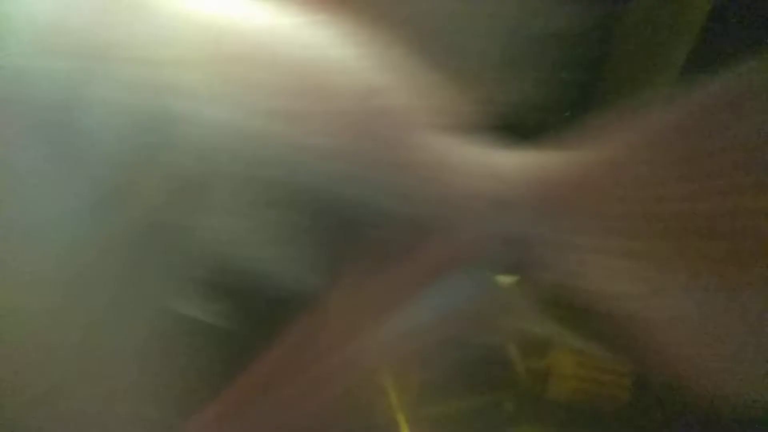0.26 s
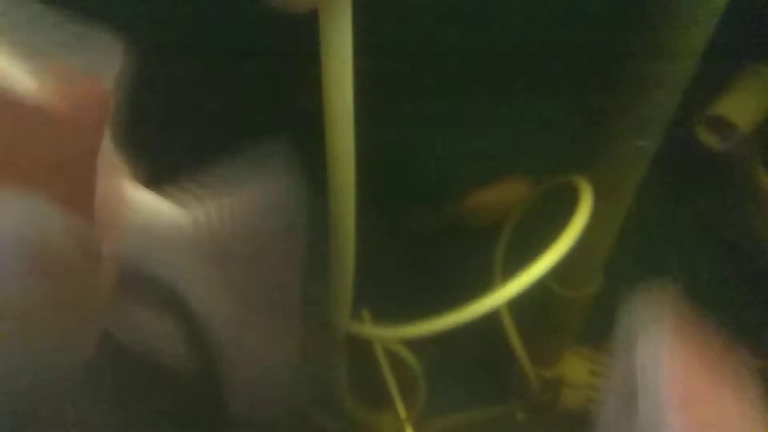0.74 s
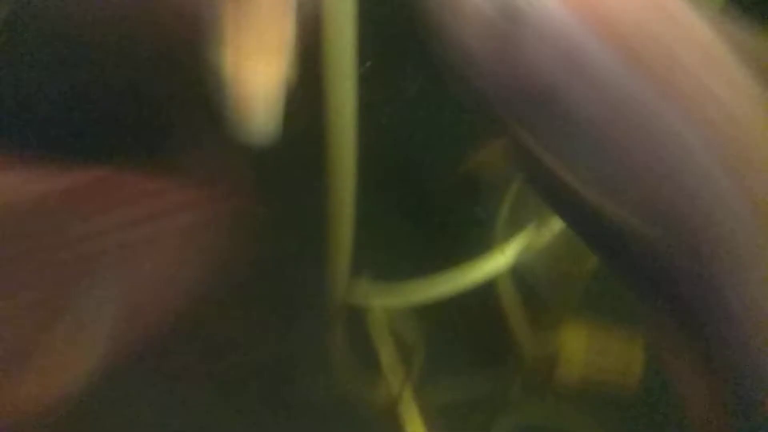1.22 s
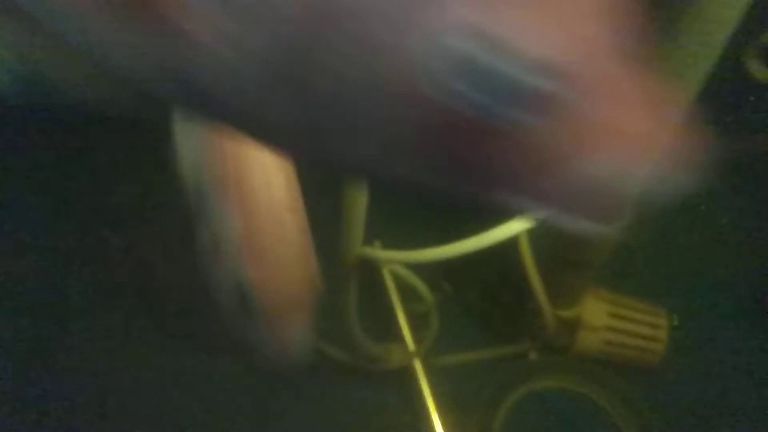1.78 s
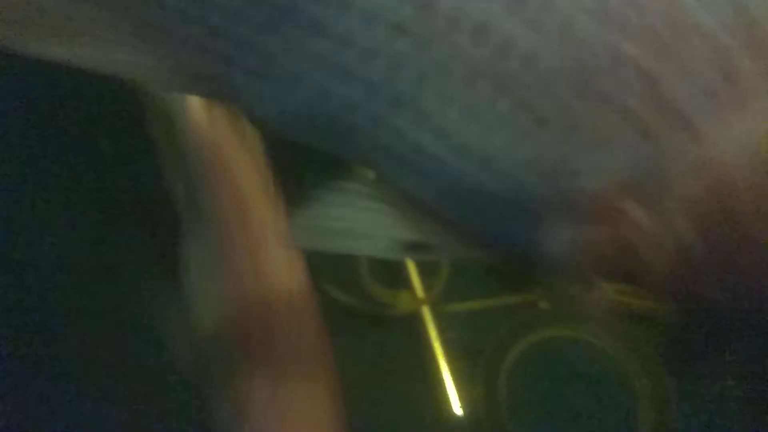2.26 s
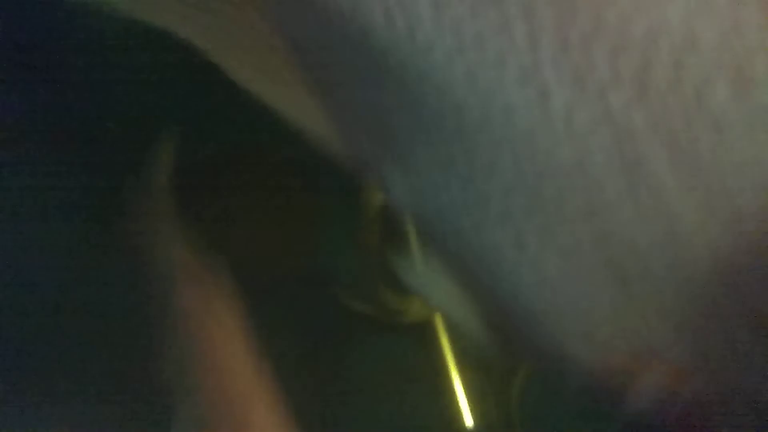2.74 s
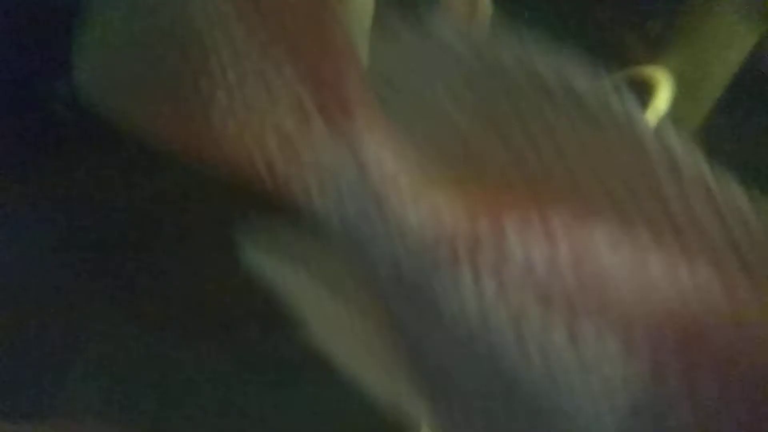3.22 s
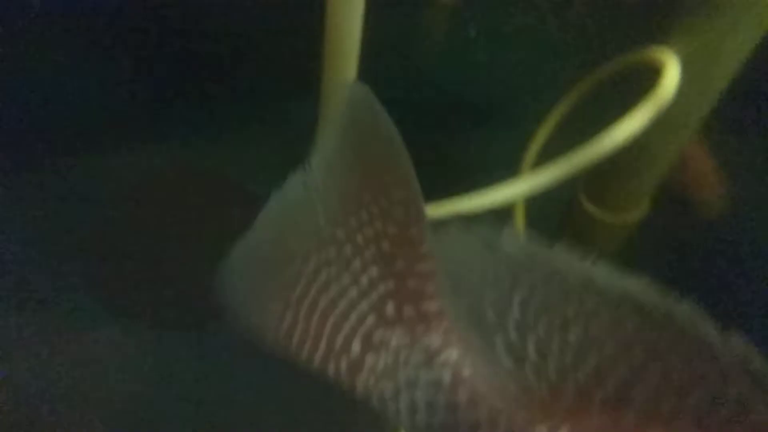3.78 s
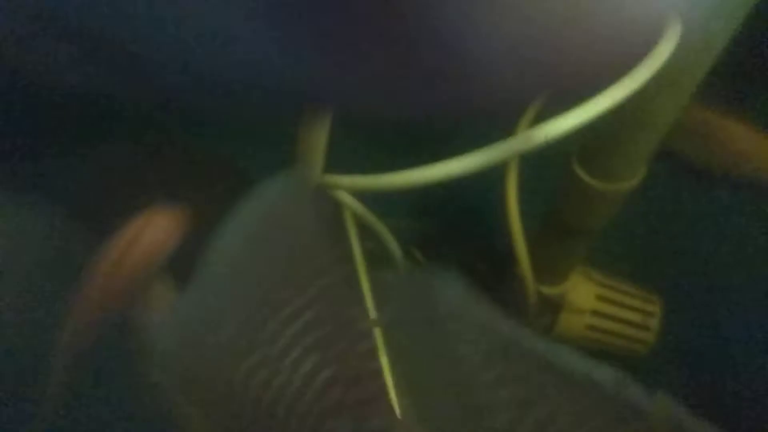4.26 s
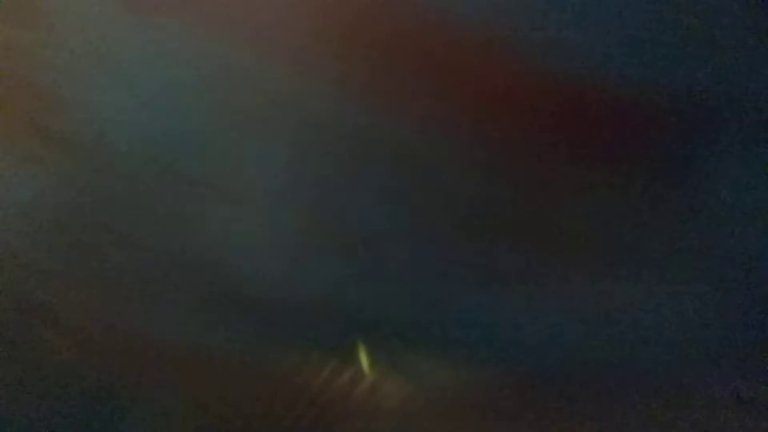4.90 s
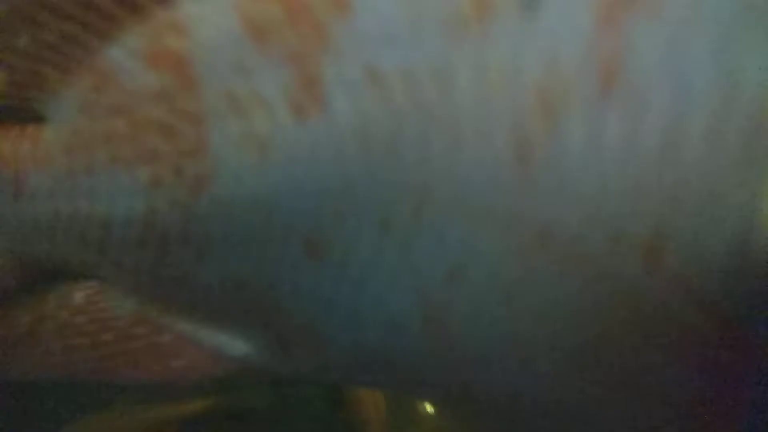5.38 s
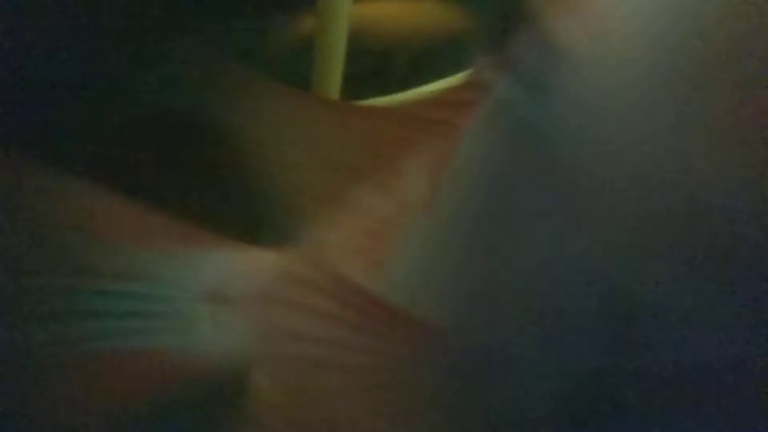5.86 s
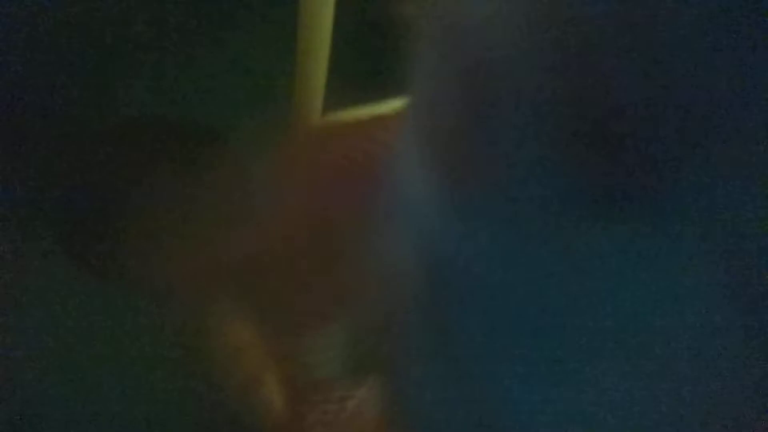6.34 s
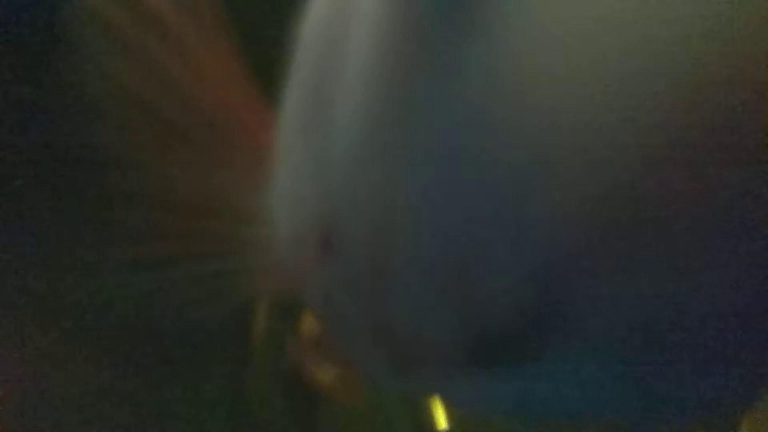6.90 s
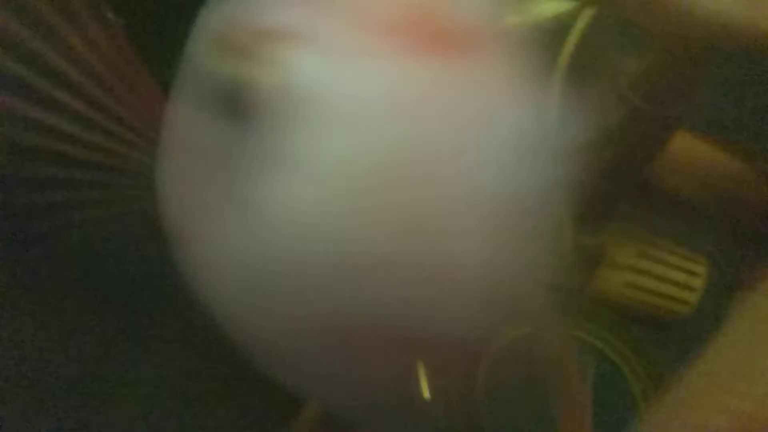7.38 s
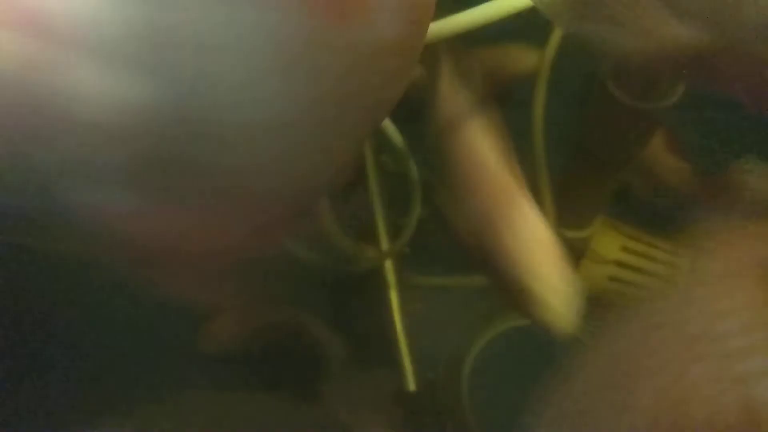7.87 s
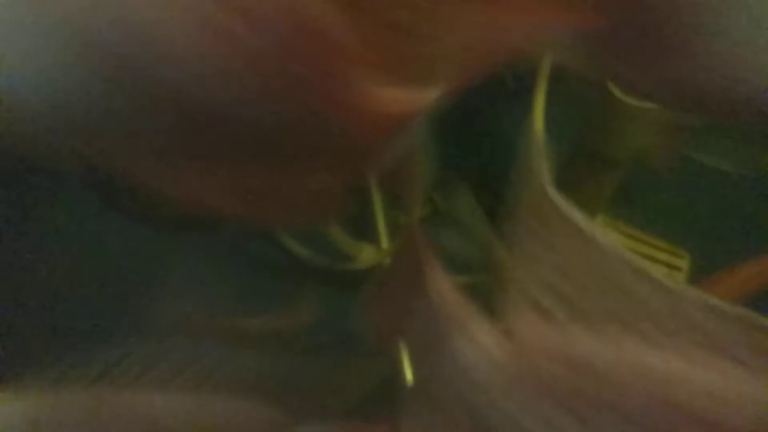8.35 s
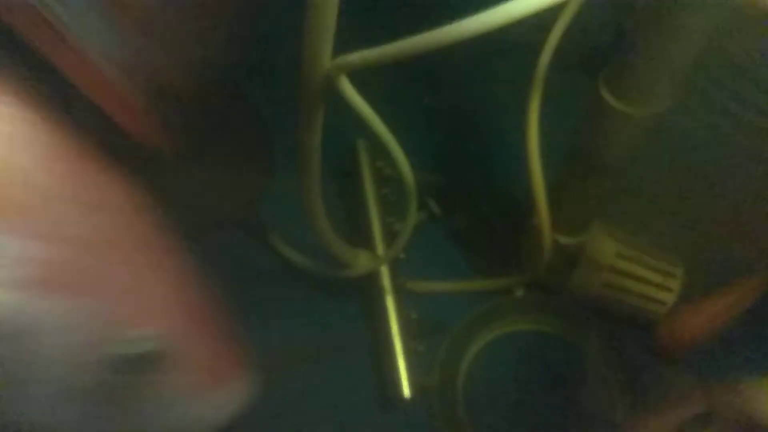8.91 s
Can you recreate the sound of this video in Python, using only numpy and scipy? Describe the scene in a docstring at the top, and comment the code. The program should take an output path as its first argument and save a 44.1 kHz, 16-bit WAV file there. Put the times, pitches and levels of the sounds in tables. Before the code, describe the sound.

Hollow, low bubbling from an air outlet heard beneath the water, strong at first then fainter, dotted with crisp clicks and brief scratches.

```python
"""Air bubbles in a fish tank

Heard under water through a sealed two-port camera housing. Large bubbles break off an outlet as short two-note
rings; the air cloud is noise on low resonances, with surges as low rings; small bubbles are random faint rings.
Noise bursts shake the housing modes for ticks, fin brushes and fizz; taps are brief rings.
Band noise gives a flickering hiss and a thin electronic whine beneath.
"""
import sys
import numpy as np
from scipy import signal
from scipy.io import wavfile
from scipy.ndimage import uniform_filter1d

SR = 44100
rng = np.random.default_rng(int(sys.argv[2]) if len(sys.argv) > 2 else 0)


def gain_from_decibels(decibels):
    """Convert decibel values to linear amplitude factors."""
    exponent = np.asarray(decibels, float) / 20
    return 10 ** exponent


def transcribe(signal):
    """Save signal, clipped to [-1, 1], as a 16-bit WAV file at the path in sys.argv[1]."""
    frames = np.atleast_2d(signal).T
    limited = np.clip(frames, -1, 1)
    pcm = np.round(limited * 32767).astype(np.int16)
    wavfile.write(sys.argv[1], SR, pcm)


N = 402630
T_S = np.arange(N) / SR

# Hiss spectrum. Each row: frequency in Hz, relative level in dB.
HISS_SPECTRUM = [(530, -29), (900, 15), (1130, -96), (1460, 8), (1780, 3), (2200, -16.5), (2760, 0),
                 (3690, -14.5), (4220, -0.5), (4830, -10.5), (6700, -20.5), (9200, -16), (12000, -13),
                 (13400, -14.5), (14800, -31), (16500, -89)]
# Gaps in the background spectrum. Each row: frequency in Hz, width in Hz.
GAP_BANDS = [(2700, 700), (4280, 600)]
# Churning. Each row: time in seconds, gurgle in dB, small bubbles in dB (both relative).
CHURN_LEVELS = [(0.0, -21.5, -36.5), (0.1, -28, -47), (0.15, -27.5, -43), (0.29, -31.5, -43),
                (0.328, -9.5, -46), (0.66, -26.5, -36.5), (1.14, -23, -48.5), (1.35, -34, -44),
                (1.45, -29, -40.5), (1.83, -25.5, -38.5), (1.98, -37.5, -47), (2.18, -32, -43),
                (2.34, -39.5, -47), (2.54, -28.5, -42), (3.05, -33, -46.5), (3.15, -27, -49),
                (3.31, -36, -41.5), (3.41, -25, -34), (3.51, -33, -45), (3.68, -25, -35), (3.84, -39, -56),
                (4.42, -25.5, -39), (4.93, -31.5, -54), (5.21, -44, -51.5), (5.42, -27, -46),
                (5.54, -37, -33.5), (5.59, -31, -55), (5.8, -38, -49.5), (6.43, -26.5, -45.5),
                (6.69, -38, -53.5), (8.95, -37, -51), (9.13, -51, -48)]
# Air cloud resonances. Each row: frequency in Hz, width in Hz, relative level in dB.
CLOUD_MODES = [(76.5, 65, 6.5), (110.6, 31.6, 5), (128.5, 19.4, -1.5), (143.8, 25.2, 0), (210, 330, -0.5)]
# Lower housing modes. Each row: frequency in Hz, width in Hz, relative level in dB.
SHELL_LOW_MODES = [(1800, 630, 2), (2400, 470, 3), (2960, 390, 1), (3706, 300, -4)]
# Upper housing modes. Each row: frequency in Hz, width in Hz, relative level in dB.
SHELL_HIGH_MODES = [(4940, 190, -15), (6760, 2150, -3), (8600, 2700, -7.5), (9900, 4000, 0),
                    (11350, 2100, -4), (13000, 2300, -6)]
# Large bubbles pinching off. Each row: time in seconds, relative level in dB, pitch in Hz,
# upper note in Hz, relative level of the upper note against the pitch in dB.
LARGE_BUBBLES = [(0.03, -23, 606, 755, -18), (0.14, -6, 558, 703, -5), (0.241, -26.5, 542, 786.0, -9),
                 (0.313, -23.5, 576, 785, -4), (0.356, -36, 620, 740, -11), (0.541, -22.5, 705, 980, -7),
                 (0.589, -21.5, 660, 757, 2), (0.629, -30, 640, 930, 0), (0.718, -28.5, 620, 924, 0),
                 (0.749, -34, 607, 820, -14.0), (0.833, -7, 614, 840, -10), (0.918, -25, 540, 686, -17),
                 (0.94, -22, 586, 782, -1), (0.986, -6.5, 524, 632, -1), (1.024, -13.5, 544, 727, 0.5),
                 (1.091, -14.5, 538, 670, -9), (1.146, -15.5, 563, 724.0, -12),
                 (1.172, -16, 539, 723, -9.5), (1.221, -25, 512, 656, -12), (1.25, -22.5, 543, 680, -12),
                 (1.274, -16, 521, 662, -12), (1.382, -23, 568, 835, -3), (1.44, -5.5, 506, 640, -6.5),
                 (1.479, -7, 476.6, 840, -11.5), (1.611, -13.5, 510, 780, -18),
                 (1.662, -20.5, 580, 804, -18), (1.722, -14.5, 590, 764, -11), (1.771, -20.5, 598, 770, -6),
                 (1.832, -29, 635, 785, -13.5), (1.911, -19.5, 615, 793, 1), (2.018, -15, 590, 715, -1.5),
                 (2.095, -18, 567, 660, -20), (2.134, -18.5, 574, 800, -27), (2.173, -24, 571, 716, -24),
                 (2.254, -15.5, 523, 686, -12), (2.328, -27.5, 562, 730, -15), (2.374, -23.5, 555, 760, -8),
                 (2.485, -9.5, 570, 769, -4), (2.577, -19.5, 565, 660, 0.5), (2.626, -23, 547, 690, 1.5),
                 (2.67, -12.5, 517, 763, -33), (2.769, -22.5, 550, 680, -28), (2.794, -15.5, 559, 880, -14),
                 (2.858, -25.5, 528, 640, -8), (2.901, -15, 565, 790, -7), (2.978, -15.5, 550, 764, -12.5),
                 (3.095, -17, 593, 760, -1), (3.147, -6.5, 566, 727, -3), (3.355, -38, 541, 710, -18),
                 (3.389, -18.5, 542, 690, -9.5), (3.47, -23.5, 490, 850, -1), (3.514, -20, 527, 867, -3),
                 (3.554, -27, 548, 855, -5), (3.604, -14.5, 580, 750, -7.5), (3.681, -24.5, 590, 710, -18),
                 (3.712, -37, 576, 724.0, -15), (3.75, -24, 558, 740, -8), (3.8, -29, 530, 790, -11),
                 (3.866, -41, 612, 815, 10), (3.903, -13.5, 548, 680, -9), (3.968, -23, 553, 806, 2.5),
                 (3.994, -19.5, 563, 780, -6), (4.022, -10, 507, 700, -10.5), (4.082, -25.5, 538, 713, -2),
                 (4.113, -28.5, 498, 680, -4.0), (4.191, -17.5, 558, 770, -40),
                 (4.271, -26, 527, 690, -24.5), (4.296, -39, 527, 764.0, -28.0),
                 (4.346, -11, 533, 640, -9.5), (4.433, -6.5, 512, 688, -4.5), (4.538, -25, 563, 927, -4),
                 (4.568, -30, 621, 870, -1), (4.627, -29, 614, 746, 7), (4.684, -22, 555, 787, 0),
                 (4.735, -16.5, 514, 658, -1), (4.786, -8.5, 516, 703, -9.5), (4.856, -20, 520, 780, -4.5),
                 (4.893, -14, 523, 759, -2.5), (5.265, -25.5, 628, 727, 0.5), (5.351, -18.5, 600, 780, -3),
                 (5.402, -28, 566, 720, -2), (5.478, -25.5, 592, 760, -4), (5.535, -28, 640, 754, 6.5),
                 (5.585, -18.5, 636, 884, -7), (5.626, -28.5, 590, 690, -4), (5.654, -27.5, 578, 690, -1),
                 (5.689, -23, 526, 654.0, -20), (5.743, -32.5, 684, 853.0, -31),
                 (5.856, -30.5, 550, 710, -2), (5.887, -33, 550, 690, -16), (5.916, -25, 574, 710, -12),
                 (6.002, -15, 566, 667, -1.5), (6.093, -11, 466, 675, -5.5), (6.202, -17, 512, 700, -7.5),
                 (6.257, -22.5, 562, 800, -3), (6.312, -20, 546, 830, -45), (6.46, -26.5, 566, 830, -6),
                 (6.507, -28.5, 598, 912, 7.5), (6.6, -18.5, 654, 811, -0.5), (6.652, -32, 600, 746, 7.5),
                 (6.698, -28, 574, 670, -1), (6.772, -22.5, 595, 785, -8), (6.799, -34.5, 643, 790, -7),
                 (6.848, -25.5, 650, 785, -3), (6.925, -33, 633, 795, -4), (7.028, -32.5, 653, 840, -1.5),
                 (7.107, -34, 630, 750, 2.5), (7.181, -23, 576, 827, -3.5), (7.324, -24.5, 568, 646, -1.5),
                 (7.362, -32, 558, 676.0, -18), (7.395, -26.5, 519, 670, -6.5), (7.476, -33, 540, 690, -6),
                 (7.572, -28.5, 640, 850, 1.5), (7.651, -17, 674, 813, -6), (7.718, -37, 650, 870, 3),
                 (7.748, -36.5, 640, 800, -15), (7.813, -37.5, 634, 890, -17), (7.872, -28, 602, 820, -5),
                 (7.923, -24, 589, 740, -2), (7.955, -34.5, 554, 660, -17), (7.993, -25.5, 543, 637, -4.5),
                 (8.032, -21.0, 534, 723, -3), (8.101, -29.5, 495, 610, -5), (8.126, -30, 507, 650, -10.5),
                 (8.164, -35, 540, 780, -1), (8.212, -23.5, 528, 814, -6.5), (8.24, -30, 551, 890, 1),
                 (8.409, -30, 605, 760, -4), (8.439, -28, 594, 720, -14), (8.507, -19, 603, 710, -12),
                 (8.568, -23.5, 622, 734, 2.5), (8.609, -30.5, 582, 690, -11), (8.657, -33, 545, 784, -2),
                 (8.696, -19.5, 534, 736, -7), (8.747, -28, 525, 716, -6), (8.804, -33, 522.0, 790, -9),
                 (8.826, -37, 515, 780, -18.5), (8.93, -31, 576, 890, 5.5), (8.983, -27, 606, 857, 1),
                 (9.035, -48, 650, 794, -3.5), (9.086, -31.5, 632, 810, -1)]
# Surges of the air cloud. Each row: time in seconds, relative level in dB, pitch in Hz.
SURGES = [(0.14, -17, 210), (0.31, -7, 256), (0.312, -6.5, 153), (0.407, -6.5, 198.4), (0.501, -8, 180),
          (0.563, -9.5, 126), (0.754, -15, 193.6), (0.98, -27, 214), (1.087, -24, 196), (1.144, -16.5, 210),
          (1.484, -23.5, 178), (1.61, -18, 199), (1.772, -14.5, 198), (2.539, -20, 174), (3.383, -19, 135),
          (3.677, -16.5, 159.5), (4.349, -17, 138), (4.433, -13.5, 150), (4.794, -18, 119),
          (5.358, -21.5, 122), (5.402, -20, 146), (5.6, -18.5, 158.5), (6.26, -23, 132), (6.398, -19, 150),
          (7.141, -25, 138), (7.731, -19.5, 141), (8.121, -28, 125), (8.502, -25, 129), (8.704, -22, 109)]
# Short single rings of mixed pitch. Each row: time in seconds, relative level in dB, pitch in Hz.
SHORT_RINGS = [(0.199, -12, 973), (0.42, -20, 686), (0.462, -8.5, 756), (2.43, -22, 1110),
               (2.78, -26, 1710), (2.795, -30, 1440), (2.83, -24.5, 1800), (2.866, -28, 1640),
               (8.03, -33, 1550), (8.106, -22.5, 1490), (8.13, -31, 1510), (2.0993, -16.5, 1060),
               (2.175, -12.5, 1027), (2.2144, -19, 1004), (2.376, -19, 1085), (2.864, -19, 1050),
               (2.942, -20, 1900), (4.039, -20, 1060), (6.855, -20, 1720), (7.751, -28, 1050),
               (7.919, -17, 2484), (8.213, -25, 1490), (8.216, -21, 1650)]
# Dull taps on the housing. Each row: time in seconds, relative level in dB, pitch in Hz, left minus right in dB.
DULL_TAPS = [(0.337, -26, 1940, -8), (0.337, -34, 3070, -17), (0.3509, -26.5, 1920, -12.5),
             (0.3517, -25.5, 3620, 0), (1.767, -36.5, 1550, -21), (3.364, -28.5, 1630, -15),
             (5.0721, -24, 2540, 17), (5.0806, -12.5, 1830, 12.5), (5.086, -18, 1840, 8),
             (5.096, -25, 2070, 13), (5.168, -27.5, 1660, -1), (5.185, -18, 2180, 10.5),
             (6.444, -26, 1440, -4), (6.802, -34, 1690, -14)]
# Fins brushing the housing. Each row: start in seconds, length in seconds, relative crackle level in dB.
FIN_BRUSHES = [(.45, 0.38, -43.5), (1.23, 0.079, -53), (3.34, 0.031, -40), (5.055, 0.028, -41.5),
               (6.424, 0.035, -36.5), (7.44, 0.11, -44.5), (8.87, 0.14, -47.5)]
# Sharp ticks on the housing. Each row: time in seconds, relative level in dB, relative low ring in dB,
# left minus right in dB.
SHARP_TICKS = [(1.0233, -23, -54.5, 6), (1.857, -37, -41.5, -5), (2.534, -44, -37.5, -5),
               (2.9403, -29.5, -48, -17), (3.5641, -33, -44, -25), (4.141, -25, -45, -1),
               (4.364, -38, -41, -12), (4.3812, -33.5, -43, -11), (5.3532, -35.5, -42, 15),
               (5.8993, -39, -41.5, -2), (5.9684, -26.5, -42, 5), (6.0306, -27, -46, -18),
               (6.047, -37, -40, -10), (6.0602, -35, -40.5, -10), (2.066, -28, -68, 3),
               (3.148, -28.5, -63, 18), (5.0222, -21, -44.5, 1), (5.0435, -29.5, -39, -2),
               (6.916, -19, -45, 0), (1.526, -43, -38.5, -16), (2.135, -40, -37.5, -2),
               (2.554, -22.5, -41, -2), (3.174, -26.5, -44, -4), (3.2682, -22.5, -46.5, -5),
               (3.3476, -36.5, -33, -16), (3.3547, -27, -48, -13), (3.356, -33, -32, -13.5),
               (3.3591, -42, -36, -13), (3.37, -40, -38, -18), (4.114, -39, -45, -7),
               (4.4862, -39, -41, 16), (4.7655, -23, -43.5, -19), (4.922, -22, -45.5, -3),
               (5.0546, -47, -39, 9), (5.063, -49, -31, -5), (5.0767, -41.5, -33.5, -18),
               (5.0808, -35, -24.5, -10), (5.2876, -20, -48, 9), (5.4268, -17.5, -46.5, 4.5),
               (5.6704, -21.5, -45.5, -5), (5.7154, -14.5, -42, -1), (6.4063, -43.5, -30, 20),
               (6.4109, -51, -29, -35), (6.43, -38, -31.5, -1), (6.434, -22, -46, 7),
               (6.4494, -38, -44, -13), (6.453, -34, -36, 8), (6.4203, -43.5, -29.5, -33.5),
               (7.1335, -24, -44, 6), (7.467, -18, -51, 9), (7.991, -17, -56, 8.5), (8.2805, -24, -69, 10),
               (8.88, -29, -52, 31), (8.916, -21, -63.5, 8), (8.932, -17, -51, 0), (8.9808, -12, -54, 11),
               (8.991, -19, -45, 3)]

SHELL_MODES = [*SHELL_LOW_MODES, *SHELL_HIGH_MODES]
KNOCK_S, _, KNOCK_HZ, KNOCK_UPPER_HZ, _ = np.transpose(LARGE_BUBBLES)


def level(x, db):
    """Scale to an rms level."""
    return x * gain_from_decibels(db) / np.sqrt(np.mean(x ** 2))


def band(x, hz, width_hz):
    """Resonance with gain 1 at the centre."""
    return signal.lfilter(*signal.iirpeak(min(hz, .45 * SR), hz / width_hz, fs=SR), x)


def double_band(x, hz, width_hz):
    """Two equal resonances in series, for steeper skirts."""
    return band(band(x, hz, width_hz), hz, width_hz)


def butter(x, order, hz, kind="low"):
    """Butterworth filter."""
    return signal.sosfilt(signal.butter(order, hz, kind, fs=SR, output="sos"), x)


def walk(rate_hz):
    """Random levels held 1 / rate_hz and slewed twice; spread near 1."""
    k = int(SR / rate_hz)
    held = np.repeat(rng.standard_normal(N // k + 1), k)
    return 1.3 * uniform_filter1d(uniform_filter1d(held, k), k)[:N]


def add(out, at_s, hz, db, t60_s, pan_db=0., lead_rad=0., rise_s=.001, glide_per_s=0.):
    """Fading ring, deepest trough at the end of the rise; pitch glides and the right port leads in phase."""
    i = int(max(at_s, 0) * SR)
    t = np.arange(min(int(t60_s * SR), N - i)) / SR
    phase = 2 * np.pi * hz * (t + glide_per_s * t ** 2 / 2)
    rise = np.sin(np.pi / 2 * np.minimum(t / rise_s, 1)) ** 2
    shape = -rise * 1000 ** (-t / t60_s)
    for side, sign in enumerate((1, -1)):
        wave = np.cos(phase - 2 * np.pi * hz * rise_s - sign * lead_rad / 2)
        out[side, i:i + len(t)] += gain_from_decibels(db + sign * pan_db / 2) * shape * wave


def bubbles(count, low_hz, high_hz, cycles, spread_db, lead_rad):
    """Small bubbles at random times and pitches, each bending in pitch as it fades."""
    out = np.zeros((2, N))
    for when, pitch, loud, turn in rng.random((count, 4)):
        i = int(when * (N - 1))
        hz = low_hz[i] * (high_hz[i] / low_hz[i]) ** pitch
        add(out, i / SR, hz, spread_db * loud, cycles / hz, pan_db=-3.0, lead_rad=lead_rad * (.5 + turn),
            rise_s=0.21 / hz, glide_per_s=turn - .3)
    return level(out, 0)


def strike(modes, at_s, db, pan_db, burst_s, mix_db, bright_db=0.):
    """Short noise bursts shake the housing modes; each blow has its own mix and its own lag between ports."""
    out = np.zeros((2, N))
    k = np.arange(400)
    chance = rng.standard_normal((len(at_s), len(modes) + 1))
    fade = np.exp(-k / SR / burst_s) * np.cos(np.pi / 2 * k / len(k))
    bursts = rng.standard_normal((len(at_s), len(k))) * fade
    bursts /= np.sqrt(np.sum(bursts ** 2, axis=1, keepdims=True) / (SR * burst_s))
    start = np.clip((at_s * SR).astype(int), 50, N - 500)[:, None] + k
    lag = np.clip(14 + 12 * chance[:, -1:], -40, 40).astype(int)  # samples by which the left port trails
    for (hz, width_hz, mode_db), c in zip(modes, chance.T):
        drive = np.zeros((2, N))
        size_db = db + mode_db + mix_db * c + (hz > 7500) * bright_db
        np.add.at(drive[0], start + lag, gain_from_decibels(size_db + pan_db / 2)[:, None] * bursts)
        np.add.at(drive[1], start, gain_from_decibels(size_db - pan_db / 2)[:, None] * bursts)
        out += band(band(drive, hz, width_hz), hz, 2 * width_hz) * np.sqrt(SR / width_hz)
    return out


def cut_gaps(x):
    """Cuts two bands from hiss and fizz."""
    for hz, width_hz in GAP_BANDS:
        x = x - band(x, hz, width_hz)
    return x


def hiss():
    """Faint pump hiss: noise bands that flicker in level, with separate noise at the two ports."""
    log_hz, spectrum_db = np.log(np.transpose(HISS_SPECTRUM)[0]), np.transpose(HISS_SPECTRUM)[1]
    out = 0
    for hz in 950 * 2 ** np.arange(0, 4.2, 1 / 5):
        db = np.interp(np.log(hz), log_hz, spectrum_db) + 4 * walk(18) + 1.2 * walk(2.4)
        out = out + gain_from_decibels(db) * double_band(rng.standard_normal((2, N)), hz, hz / 6)
    return level(cut_gaps(out), -56.37)


def whine():
    """Thin high electronic whine: noise through a narrow resonance."""
    noise = rng.standard_normal((2, N))
    return level(double_band(noise, hz=14565, width_hz=130), -62) * gain_from_decibels(np.array([[2.5], [-2.5]]))


def gurgle(gurgle_db):
    """The cloud of rising air breathes on broad low resonances, jolted by every large bubble that breaks off."""
    s = np.append(-1, KNOCK_S)
    since_s = T_S - s[np.searchsorted(s, T_S) - 1]
    noise = rng.standard_normal(N) * gain_from_decibels(2.0 * walk(30) + 3 * np.exp(-since_s / 0.049))
    tilt_db_per_octave = 13 - 2.5 * T_S  # darkens with time
    hum = 0
    for hz, width_hz, db in CLOUD_MODES:
        mode = level(band(band(noise, hz, width_hz), hz, 1.02 * width_hz), 0)
        hum = hum + gain_from_decibels(db + tilt_db_per_octave * np.log2(hz / 130) + 1.1 * walk(12)) * mode
    # the cloud is too large to ring high and too small to ring very low
    hum = butter(hum, 4, [80, 225], "band")
    return butter(level(hum, -1.7) * gain_from_decibels(gurgle_db + np.array([[.7], [-.7]])), 3, 70, "high")


def rumble(gurgle_db):
    """Very low resonant noise that follows the gurgle and swells with time."""
    swell_db = 0.42 * walk(2.7) + 1.4 * T_S + 0.9 * gurgle_db
    return level(band(rng.standard_normal(N), hz=49, width_hz=15) * gain_from_decibels(swell_db), -52)


def patter(small_db):
    """Small bubbles around the drifting knock pitch and above it."""
    hz = np.interp(T_S, KNOCK_S, KNOCK_HZ)
    small = bubbles(400, .97 * hz, 1.03 * hz, cycles=40, spread_db=5.0, lead_rad=0.35)
    upper = bubbles(400, 1.2 * hz, 1.8 * hz, cycles=34, spread_db=16.5, lead_rad=2.77)
    # the outlet falls quiet while a large bubble swells
    until_s = np.append(KNOCK_S, N / SR + 1)[np.searchsorted(KNOCK_S, T_S)] - T_S
    hush_db = -18 * np.exp(-until_s / 0.013)
    return gain_from_decibels(small_db + hush_db) * (gain_from_decibels(0.5) * small + gain_from_decibels(-0.5) * upper)


def chatter():
    """Steady faint chatter of still higher bubbles."""
    low_hz, high_hz = np.full(N, 1280.), np.full(N, 1900.)
    return level(bubbles(1000, low_hz, high_hz, cycles=66, spread_db=21.0, lead_rad=1.7), -55)


def fizz():
    """Tiny bubbles bursting on the shell, in clusters."""
    u = rng.random((2200, 3)).T
    clock = np.cumsum(gain_from_decibels(3.1 * walk(13)))  # runs unevenly, so bursts cluster
    at_s = np.interp(u[0], clock / clock[-1], T_S)
    out = strike(SHELL_MODES[3:], at_s, 15 * u[1] ** 3, 14 * (u[2] - .5), burst_s=0.074, mix_db=7, bright_db=-7)
    return level(cut_gaps(out), 0) * gain_from_decibels(-55.87 + 2 * walk(2.96))


def bend_per_s(hz, low, high):
    """Glide of each ring towards the pitch of the next, within limits."""
    return np.clip(np.append(np.diff(np.log(hz)) / np.diff(KNOCK_S), 0), low, high)


def knocks(thud_db):
    """Large bubbles ring on two notes, with weak third and top notes, a thud and a smaller bubble shed after."""
    out = np.zeros((2, N))
    bends = bend_per_s(KNOCK_HZ, -2, 2.5)
    upper_bends = bend_per_s(KNOCK_UPPER_HZ, -1.2, 5)
    chance = rng.standard_normal((len(KNOCK_S), 5))
    for (at, db, hz, upper_hz, upper_db), bend, upper_bend, c in zip(LARGE_BUBBLES, bends, upper_bends, chance):
        rise_s = 0.002405 * gain_from_decibels(-0.1 * (db + 10.5))  # fainter bubbles let go more gently
        at += .0014 - rise_s
        upper_db = db + upper_db - 5
        # the top note sits near one pitch for all knocks
        add(out, at + 0.00182, 965 * (1 + 0.059 * c[4]), 0.76 * (db + 23) - 38 + 4 * c[1], .07, -2, 1.5, .002, .9)
        add(out, at, hz, db - 2.0, 0.12, -2.5, .55, rise_s, bend + 0.23)
        # the neck snaps back and sheds a smaller bubble
        add(out, at + 0.042 + 0.00213 * c[3], upper_hz * 1.03, upper_db - 15.0, .07, -4.5, .8, .0024, .6)
        add(out, at, upper_hz, upper_db, 0.1, -4.5, .8, rise_s, upper_bend + 0.52)
        # third note
        add(out, at, hz * 0.962 * (1 + 0.213 * abs(c[0])), db - 17.5 + 1.8 * c[1], .05, 1.5, 1.5, .003)
        # thud
        add(out, at, 220 * np.exp(0.16 * c[2]), db + thud_db[max(int(at * SR), 0)], 0.033, 2.5, .1, rise_s)
    # the sealed housing muffles the edge of every knock
    return butter(butter(out, 4, 912), 2, 110, "high")


def surges():
    """Big surges of the air cloud: low rings with falling pitch and two weaker upper notes."""
    out = np.zeros((2, N))
    for at, db, hz in SURGES:
        at -= .006
        add(out, at, hz, db + 0.039, .17, 1.5, .15, .008, -1.2)
        add(out, at, hz * 2.0, db - 17.5, .04, 1.5, .15, .004, -2.5)
        add(out, at, hz * 1.593, db - 17.5, .1, 1.5, .15, .006)
    return butter(out, 3, 70, "high")


def short_rings():
    """Short single rings of mixed pitch, each climbing in pitch."""
    out = np.zeros((2, N))
    for at, db, hz in SHORT_RINGS:
        add(out, at, hz, db - 8.0, .06, 1.5, 2.2, .003, .8)
    return out


def taps():
    """Dull taps on the housing: very short single rings."""
    out = np.zeros((2, N))
    for at, db, hz, pan_db in DULL_TAPS:
        add(out, at + 0.00084, hz, db + 7.0, .012, pan_db, 2.2, .0008)
    return out


def brushes():
    """Fins brushing the housing: each brush crackles with 24 random blows."""
    start_s, length_s, db = np.repeat(FIN_BRUSHES, 24, axis=0).T
    u = rng.random((len(db), 3)).T
    return strike(SHELL_MODES[4:], start_s + length_s * u[0], db - 25.0 + 12 * u[1], 12 * u[2] - 8,
                  burst_s=0.0063, mix_db=6.9)


def ticks():
    """Sharp blows on the housing modes; harder blows ring both lower and brighter."""
    s, db, low_db, pan_db = np.transpose(SHARP_TICKS)
    s = s + 0.00061
    bright_db = -3.5 + 2.13 * (low_db + 45.5)
    out = strike(SHELL_HIGH_MODES, s, db - 10.0, pan_db, burst_s=.0005, mix_db=2, bright_db=bright_db)
    # ticks with little low ring come back once, softer and smeared
    little_low = low_db < -40
    out += strike(SHELL_HIGH_MODES, s[little_low] + .019, db[little_low] - 26.5, pan_db[little_low],
                  burst_s=0.0041, mix_db=2, bright_db=-6.5)
    out = butter(out, 2, 11100)
    return out + strike(SHELL_LOW_MODES, s, low_db - 6.0, pan_db, burst_s=0.00084, mix_db=2)


def scene():
    """All sources as they reach the two ports; the gurgle also sets the weight of the thuds."""
    s, *columns = np.transpose(CHURN_LEVELS)
    gurgle_db, small_db = (np.interp(T_S, s, c) for c in columns)
    thud_db = -2 + 1.62 * (gurgle_db + 29.0)
    background = hiss() + whine() + fizz()
    air = gurgle(gurgle_db) + rumble(gurgle_db) + surges()
    rings = patter(small_db) + chatter() + knocks(thud_db) + short_rings()
    contacts = taps() + brushes() + ticks()
    return background + air + rings + contacts


def low_pass(x):
    """Removes everything above the highest recorded frequency."""
    return signal.sosfilt(signal.butter(12, 16810, fs=SR, output="sos"), x)


def record(dry):
    """Gentle soft limit on the loudest peaks."""
    mix = np.tanh(0.87 * dry) / 0.85
    return low_pass(mix)


dry = scene()
out = record(dry)
transcribe(out)
```